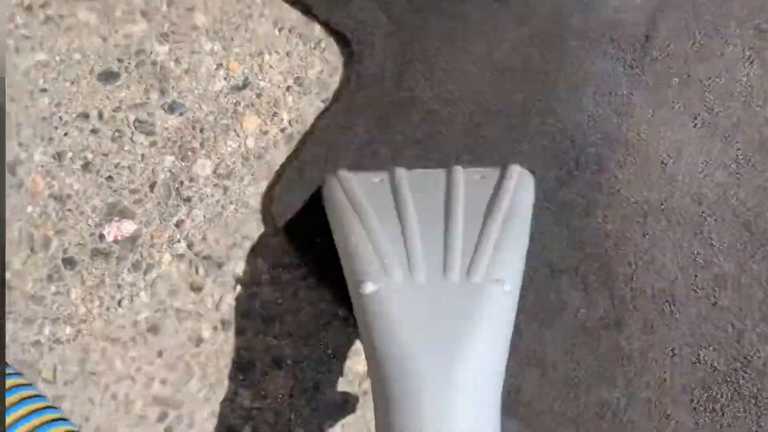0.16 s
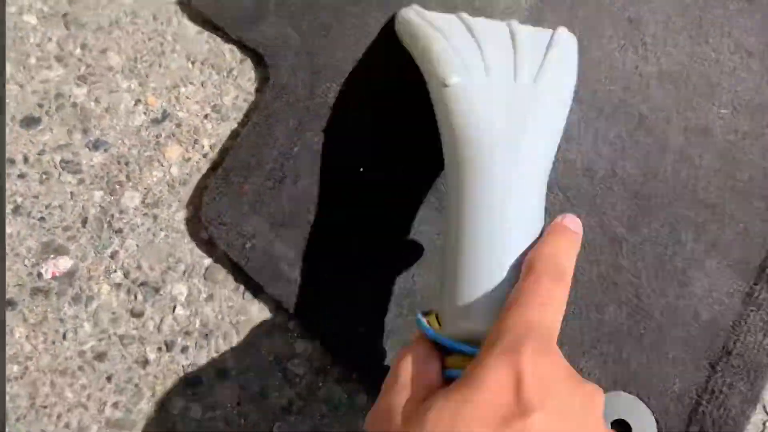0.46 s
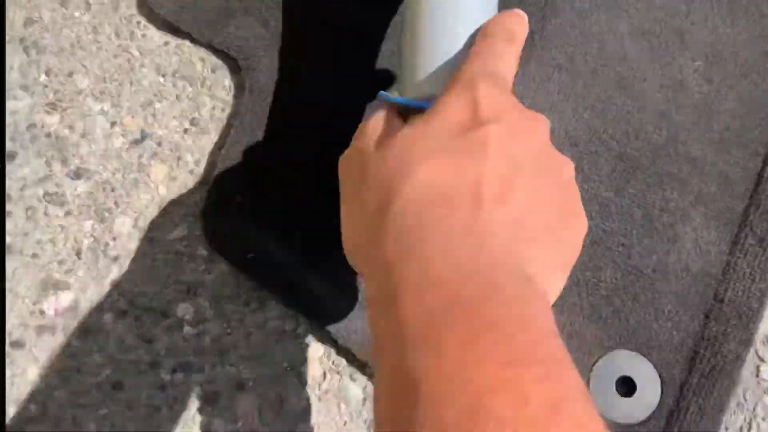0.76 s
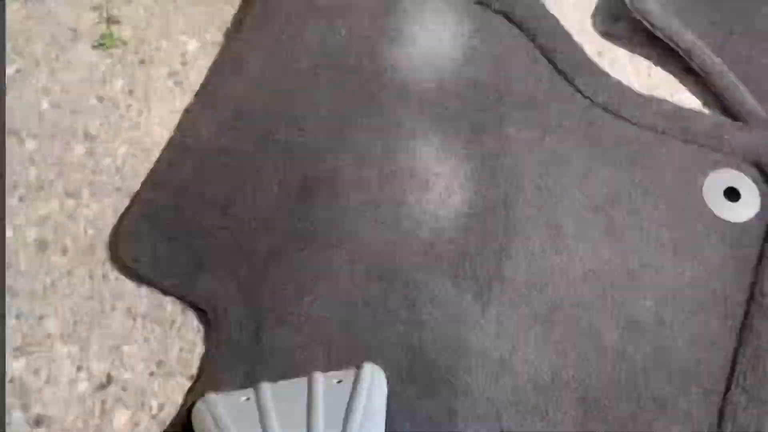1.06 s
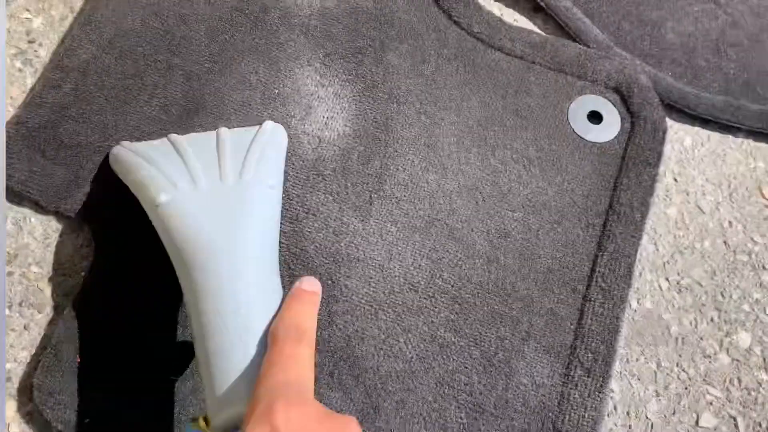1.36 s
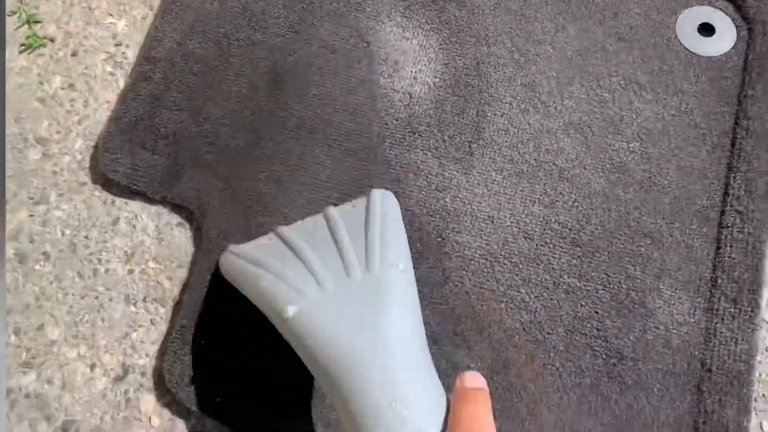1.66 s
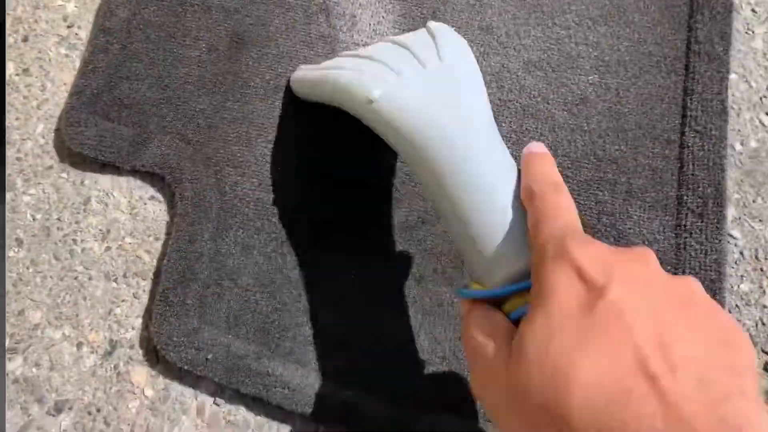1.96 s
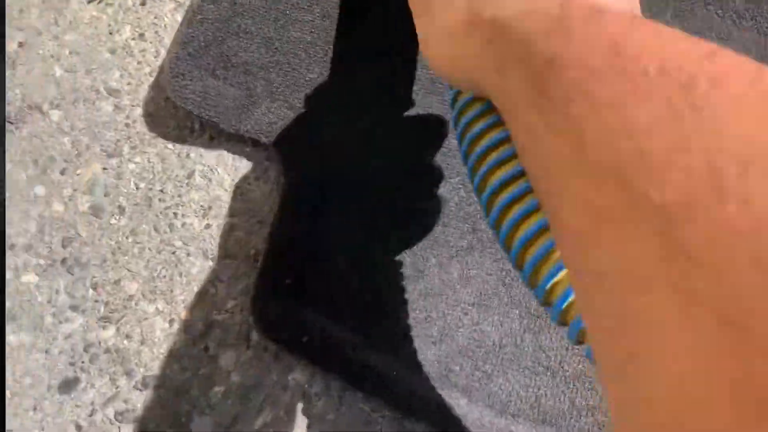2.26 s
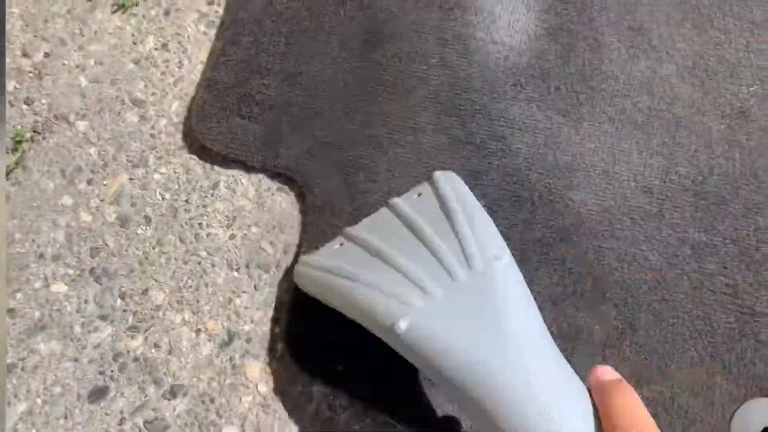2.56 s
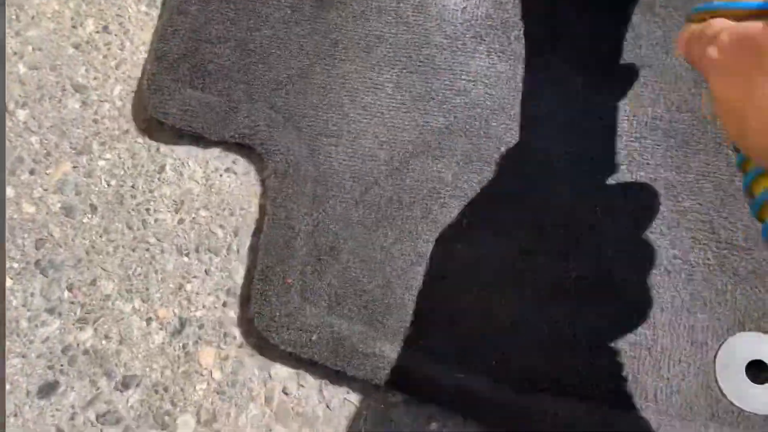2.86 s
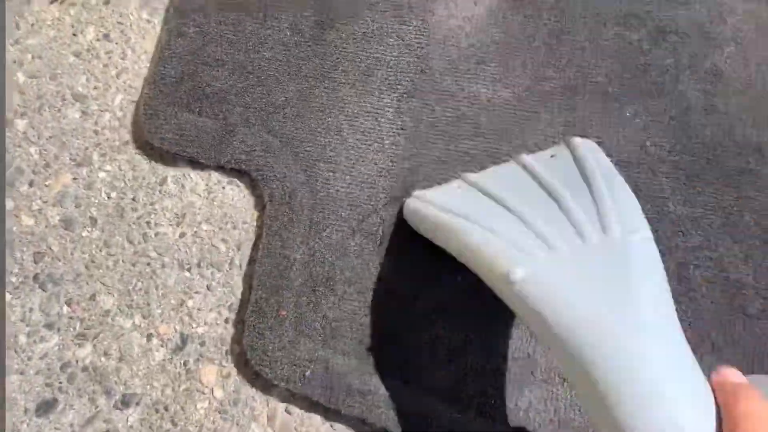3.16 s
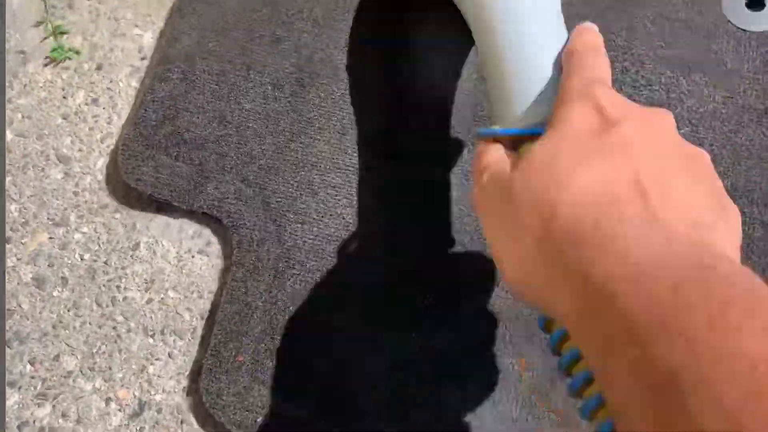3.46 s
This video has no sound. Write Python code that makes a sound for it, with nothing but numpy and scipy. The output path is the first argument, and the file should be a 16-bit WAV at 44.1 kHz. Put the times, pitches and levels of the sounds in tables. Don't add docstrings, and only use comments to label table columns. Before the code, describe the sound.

From 0 to about 3.6 seconds a car wash vacuum roars without pause: a low hum of two slightly detuned motors, beating quickly and heavier on the left, under broad suction hiss. Around 0.55-0.8 seconds a soft, dull grip rub thumps on the microphone. Hollow hose tone swells around 0.9-2 seconds, then recedes; the nozzle's airy resonance opens near 2.8-3.4. Faint traffic rumbles outdoors.

```python
import sys
import numpy as np
from scipy import signal
from scipy.fft import rfft, irfft, next_fast_len
from scipy.io import wavfile
from scipy.ndimage import uniform_filter1d, map_coordinates

SR = 44100
rng = np.random.default_rng(int(sys.argv[2]) if len(sys.argv) > 2 else 0)


def magnitude_from_level(level_db):
    exponent = np.asarray(level_db, float) / 20
    return 10 ** exponent


def to_wav(sig):
    pcm = np.clip(np.atleast_2d(sig), -1, 1) * 32767
    pcm = np.round(pcm).astype(np.int16)
    wavfile.write(sys.argv[1], SR, pcm.T)


N = 158760

SHAFT_HZ = (280.07, 295.69)
# [multiple of shaft rate, left level/dB, right level/dB]
MOTOR_ONE_ORDERS = [(1, -31, -40.5), (2, -58, -56.5), (5, -54, -60), (6, -40, -42), (11, -53, -61),
                    (19, -52, -52)]
# [multiple of shaft rate, left level/dB, right level/dB]
MOTOR_TWO_ORDERS = [(0.9937, -26.5, -40), (2, -50, -50.5), (6, -44.5, -45), (12, -53, -54), (22, -60, -60),
                    (24, -52.5, -52.5), (36, -66, -65)]
# [t/s, nearness to motors/dB, hose facing camera/dB, mouth opening/dB, airflow/dB]
POSE = [(0, -4, -8, 2.5, 1), (.4, -1.5, -9, 1, -1), (.7, 0, -9, 0, -0.5), (.85, 0.5, -0.5, -0.5, 0),
        (1.25, 1.5, 3, -4.5, 0), (1.45, 0.5, 2, 2.5, -2), (1.75, 0, 2.5, 1, -1), (2.03, 0, 1, -4, 0),
        (2.15, 0, -6, -7, 0.5), (2.5, 0, -4, 0.5, .5), (2.8, -1, -11, 3, 0.5), (3.05, -.5, -28, 4.5, .5),
        (3.35, 0, -9, 4, 0), (3.6, 1.5, -11, -4, -1)]
# [f/Hz, level/dB]
HISS_SPECTRUM = [(900, -31), (2000, 0), (4000, -3.5), (6000, -6.5), (8500, -8), (10500, -13), (13000, -17),
                 (15700, -19.5)]
# [f/Hz, correlation/1]
HISS_LIKENESS = [(1500, 0.22), (3000, .65), (4400, .78), (5000, .86), (6000, 0.92), (14000, .92)]
# [f/Hz, phase/rad]
LEFT_LEAD = [(0, 0), (1500, .5), (2300, 1.5), (3600, 1.64), (4200, 2.12), (4800, 3.14), (6000, 5),
             (6900, 6.5), (15200, 19)]
# [f/Hz, width/Hz, left level/dB, right level/dB, likeness/1]
HOUSING_MODES = [(328, 107, -43, -49, .5), (405, 65, -37.5, -41.5, 0.81), (637, 180, -42.5, -38.5, -0.44),
                 (833.6, 167, -36, -41, 0.31), (975, 220, -45.5, -43.5, -0.43),
                 (1535, 210, -37, -36.5, -0.53), (1700, 220, -33.5, -33.5, .75),
                 (3794, 620, -40.5, -40.5, -0.39)]
# [f/Hz, level/dB]
TRAFFIC_SPECTRUM = [(18, -42), (33, -13), (43, 1), (58, 2), (105, -3), (150, -5.5), (250, -5.5), (520, -9)]
# [t/s, level/dB]
GRIP_SHIFTS = [
    (.56, -31),
    (.6, -36),
    (.645, -33),
    (.7, -33),
    (.74, -42),
]
# [f/Hz, level/dB]
RUB_SPECTRUM = [(35, -20), (60, -5), (105, -2), (150, -17), (230, -5), (285, 6), (420, -3), (650, -33)]
BAND_BINS = (196, 216, 240, 264, 292, *range(320, 768, 32))


def unit(x):
    return x / np.sqrt(np.mean(x ** 2) + 1e-20)


def along(points, hz):
    f, v = np.transpose(points)
    return np.interp(np.log(hz + 1), np.log(f + 1), v)


def pose():
    s, *columns = np.transpose(POSE)
    return [np.interp(np.arange(N) / SR, s, column) for column in columns]


def wobble(rate):
    return map_coordinates(rng.standard_normal(200), [np.arange(N) * rate / SR])


def filtered(x, response):
    m = next_fast_len(N + 8192)
    return irfft(rfft(x, m) * response(np.fft.rfftfreq(m, 1 / SR)), m)[..., :N]


def lead(hz):
    return np.exp(.5j * np.interp(hz, *np.transpose(LEFT_LEAD)) * np.array([[1], [-1]]))


def random_field(shape, frequency_size, time_size):
    field = uniform_filter1d(rng.standard_normal(shape), frequency_size, axis=0)
    return unit(uniform_filter1d(field, time_size, axis=1))


def rush(gain, alike, patchy_db):
    pair = rng.standard_normal((2, N))
    if patchy_db:
        z = signal.stft(pair, nperseg=1024)[2]
        patches = patchy_db * random_field(z.shape[1:], 10, 5)
        streaks = 2.3 * random_field(z.shape[1:], 2, 24)
        pair = signal.istft(z * magnitude_from_level(patches + streaks), nperseg=1024)[1][:, :N]

    def mid_side_gain(hz):
        turn = np.arccos(np.clip(alike(hz), -1, 1)) / 2
        return gain(hz) * [np.cos(turn), np.sin(turn)]

    mid, side = filtered(pair, mid_side_gain)
    return unit(np.array([mid + side, mid - side]))


def ringing(hz, width, alike, patchy_db):
    return rush(lambda f: 1 / (1 + ((f * f - hz * hz) / (f * width + 1)) ** 2), lambda f: alike + 0 * f, patchy_db)


def motors():
    near_db = pose()[0]
    beat_peak_s = .0204
    t = np.arange(N) / SR - beat_peak_s
    out = np.zeros((2, N))
    for hz, orders in zip(SHAFT_HZ, (MOTOR_ONE_ORDERS, MOTOR_TWO_ORDERS)):
        slip_rad = .14 * wobble(4)
        angle = 2 * np.pi * hz * t + slip_rad
        for k, left_db, right_db in orders:
            depth_db = 3.3 if k > 1 else .6
            flutter_db = depth_db * wobble(12) + 0.96 * np.array([wobble(4), wobble(5)])
            level = magnitude_from_level(np.array([[left_db], [right_db]]) + near_db + flutter_db)
            out += level * np.sqrt(2) * np.sin(round(k) * angle)
    return filtered(out, lead)


def duct_tone():
    hose_db = pose()[1]
    t = np.arange(N) / SR - .0204
    tone = np.sin(2 * np.pi * 4 * SHAFT_HZ[0] * t + .5 * wobble(5))
    return magnitude_from_level(-42 + hose_db + 2.5 * wobble(8.3)) * np.sqrt(2) * tone


def airflow_hiss():
    flow_db = pose()[3]
    hiss = rush(lambda f: magnitude_from_level(along(HISS_SPECTRUM, f)), lambda f: along(HISS_LIKENESS, f), patchy_db=1.1)
    return magnitude_from_level(-26 + flow_db + 0.62 * wobble(9) + 0.17 * wobble(40)) * filtered(hiss, lead)


def housing_resonances():
    near_db = pose()[0]
    out = np.zeros((2, N))
    for hz, width, left_db, right_db, alike in HOUSING_MODES:
        level_db = np.array([[left_db], [right_db]]) + .3 * near_db + 1.6 * wobble(8)
        out += magnitude_from_level(level_db) * ringing(hz, width, alike, 0)
    return out


def hose_and_mouth_resonances():
    _, hose_db, mouth_db, _ = pose()
    hose = magnitude_from_level(-39.5 + 0.88 * hose_db) * ringing(1145, 147, alike=0.56, patchy_db=2.5)
    mouth = magnitude_from_level(-34.5 + mouth_db) * ringing(1365, 230, alike=0.53, patchy_db=1.5)
    return hose + mouth


def traffic():
    likeness = [(45, 1.0), (100, 0.93), (250, 0.51)]  # (f/Hz, correlation/1)
    rumble = rush(lambda f: magnitude_from_level(along(TRAFFIC_SPECTRUM, f)) / (1 + (f / 700) ** 4),
                  lambda f: along(likeness, f), patchy_db=1.5)
    return magnitude_from_level(-41.5 + wobble(4.85)) * rumble


def grip_rub():
    rise_s, t60_s = .008, 0.16
    shifts = np.array(GRIP_SHIFTS)
    since = np.clip(np.arange(N) / SR - shifts[:, :1], 0, None)
    decay = magnitude_from_level(shifts[:, 1:] - 60 * since / t60_s)
    grip = np.sum(decay * (1 - np.exp(-since / rise_s)), axis=0)
    rub = rush(lambda f: magnitude_from_level(along(RUB_SPECTRUM, f)), lambda f: 0 * f - .97, patchy_db=-4)
    return 1.8 * grip * rub


def scene():
    machine = motors() + duct_tone() + airflow_hiss() + housing_resonances() + hose_and_mouth_resonances()
    return machine + traffic() + grip_rub()


def steered(mid, side):
    start_s, length_s, ramp_s = .52, .24, .035
    low_hz, high_hz = 420, 1150
    t = np.arange(N) / SR - start_s
    steer = np.clip(np.minimum(t, length_s - t) / ramp_s, 0, 1) * magnitude_from_level(2.5 * wobble(30.7))
    low = filtered(np.array([mid, side]),
                   lambda hz: 1 / (1 + (low_hz / (hz + 1)) ** 8) / (1 + (hz / high_hz) ** 8))
    return mid - .62 * steer * low[0], side + 0.7 * steer * low[1]


def joint_stereo(mid, side):
    weak_db, offset = -6.5, 487
    frame = dict(window="cosine", nperseg=2048, noverlap=1024)
    z = signal.stft(np.pad([mid, side], ((0, 0), (offset, 0))), **frame)[2]
    for lo, hi in zip(BAND_BINS, BAND_BINS[1:]):
        power = np.sum(abs(z[:, lo:hi]) ** 2, axis=1)
        strong = power > power[::-1] * magnitude_from_level(2 * weak_db)
        z[:, lo:hi] *= strong[:, None]
    mid, side = signal.istft(z, **frame)[1][:, offset:offset + N]
    return np.array([mid + side, mid - side])


def band_limit(x):
    return signal.sosfilt(signal.butter(12, 15850, fs=SR, output="sos"), x)


def record(dry):
    centre_and_width = np.array([dry[0] + dry[1], dry[0] - dry[1]]) / 2
    mid, side = filtered(centre_and_width, lambda hz: hz < 15765)
    mix = joint_stereo(*steered(mid, side))
    return band_limit(mix)


dry = scene()
out = record(dry)
to_wav(out)
```